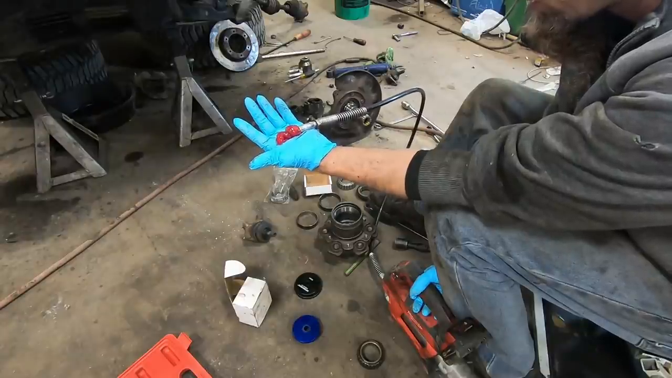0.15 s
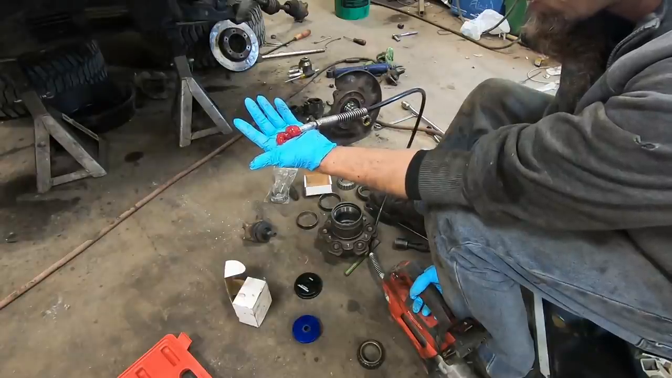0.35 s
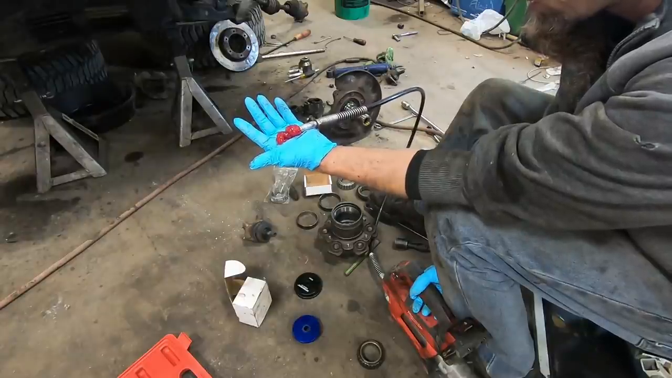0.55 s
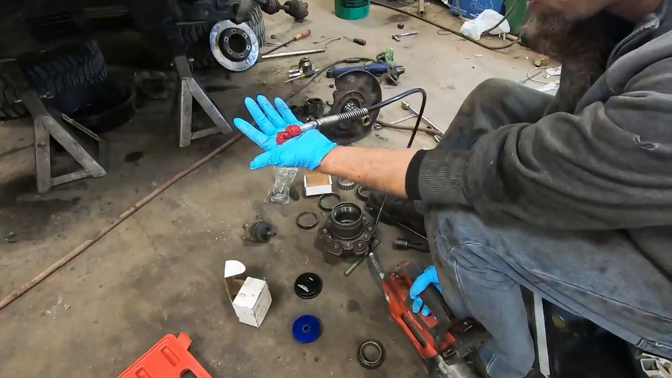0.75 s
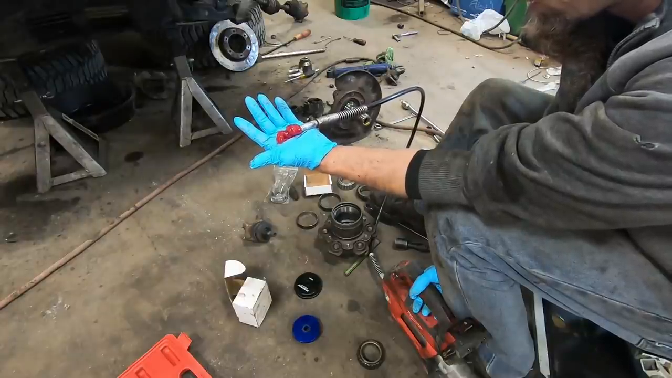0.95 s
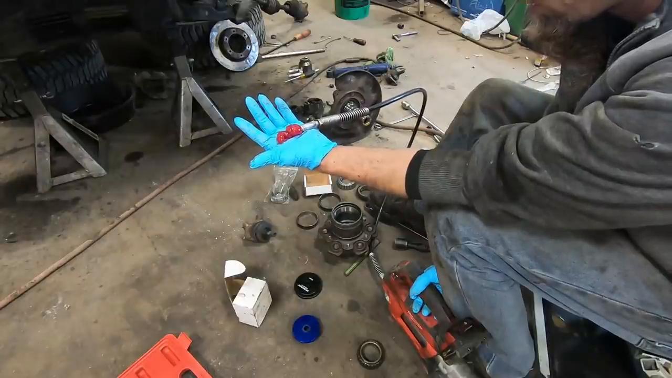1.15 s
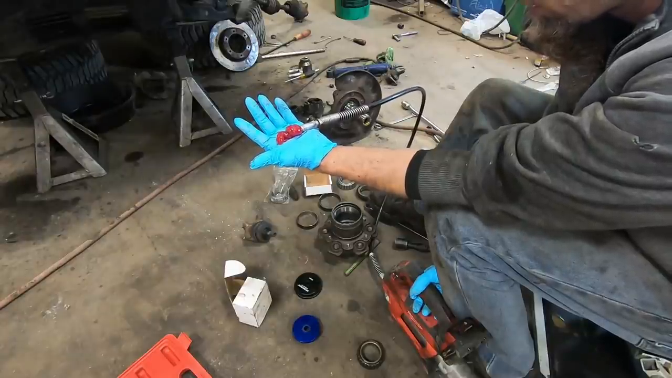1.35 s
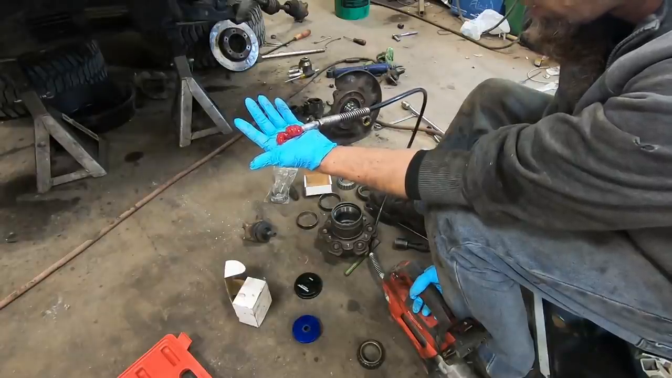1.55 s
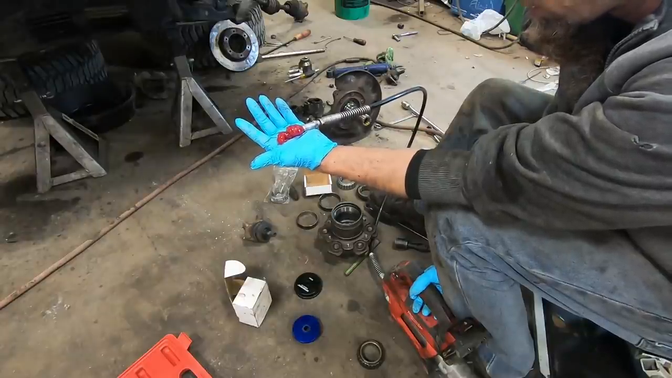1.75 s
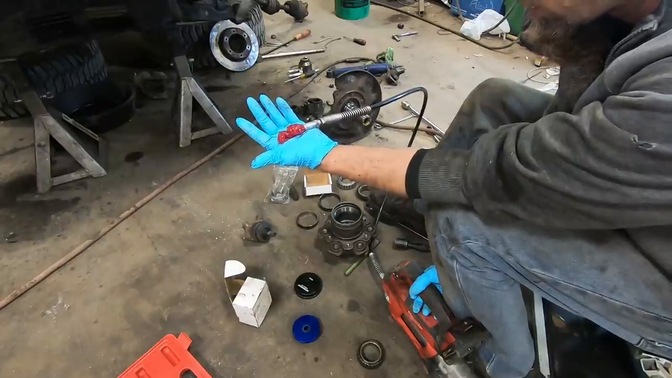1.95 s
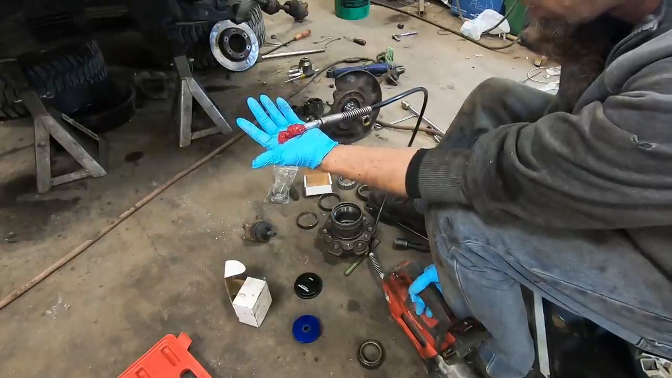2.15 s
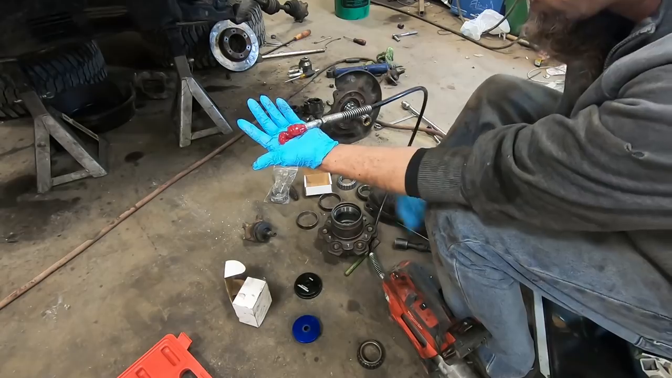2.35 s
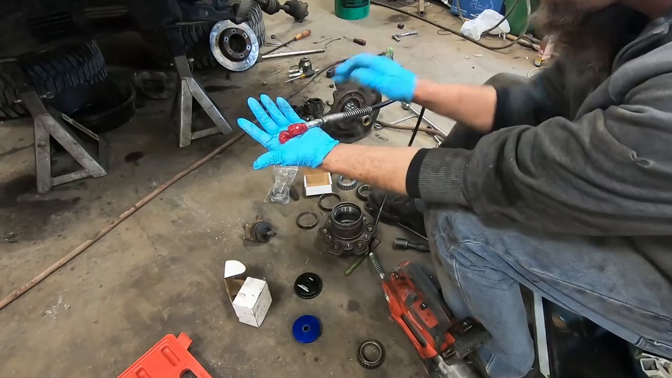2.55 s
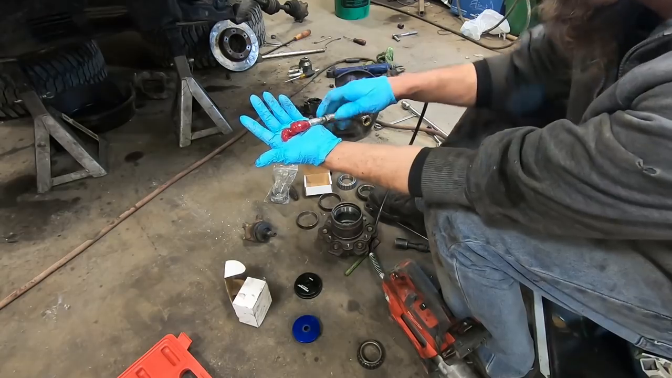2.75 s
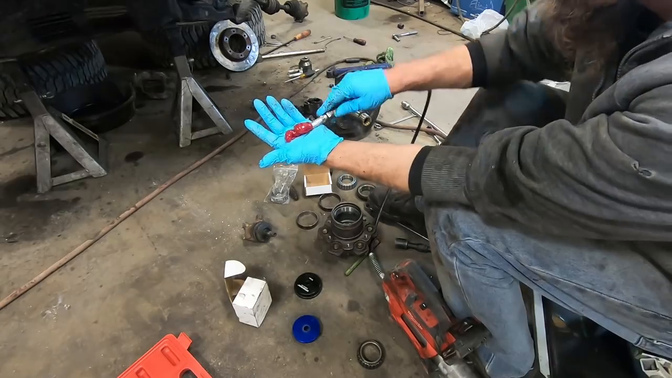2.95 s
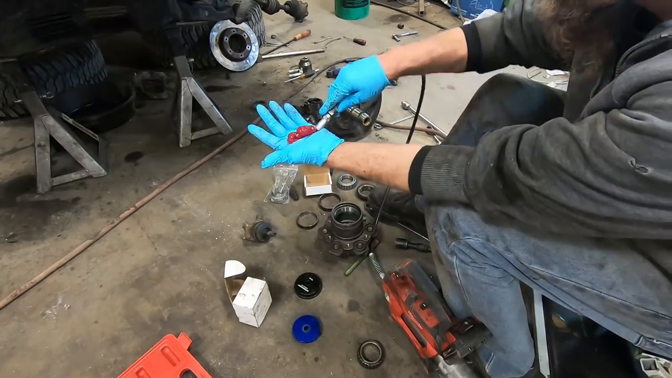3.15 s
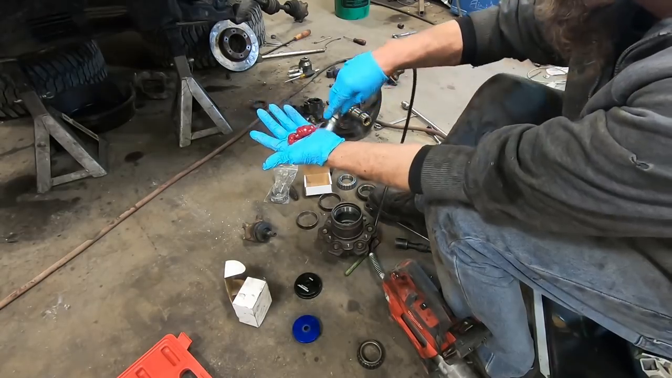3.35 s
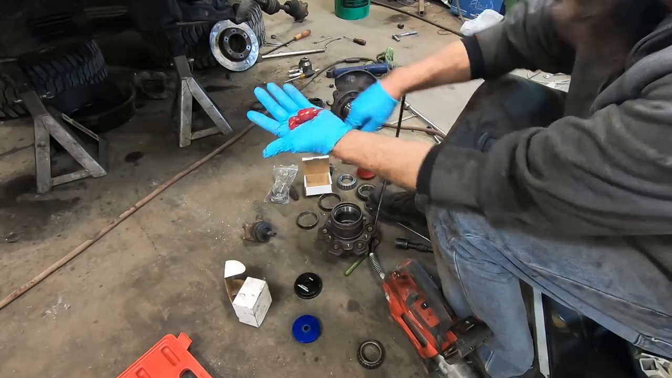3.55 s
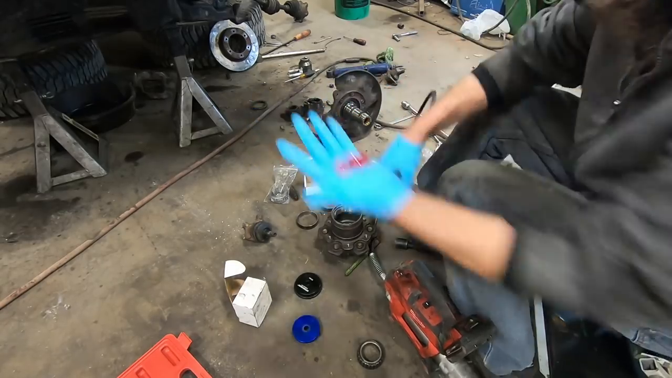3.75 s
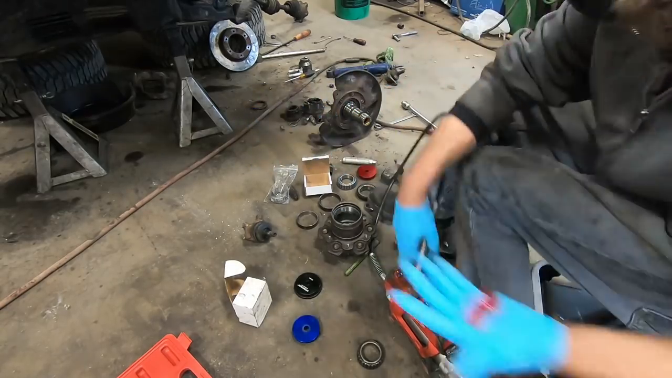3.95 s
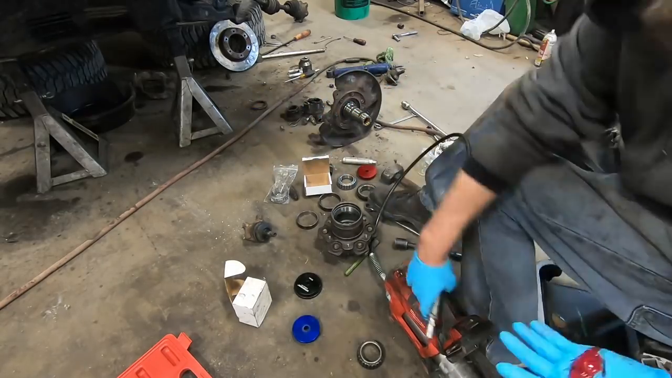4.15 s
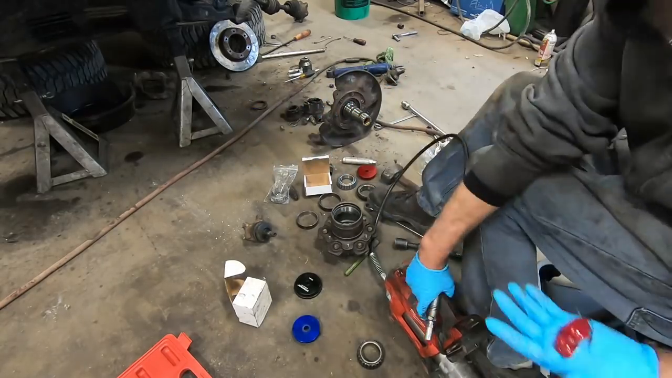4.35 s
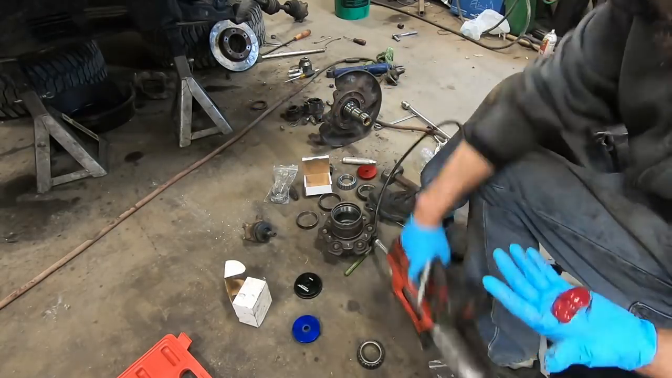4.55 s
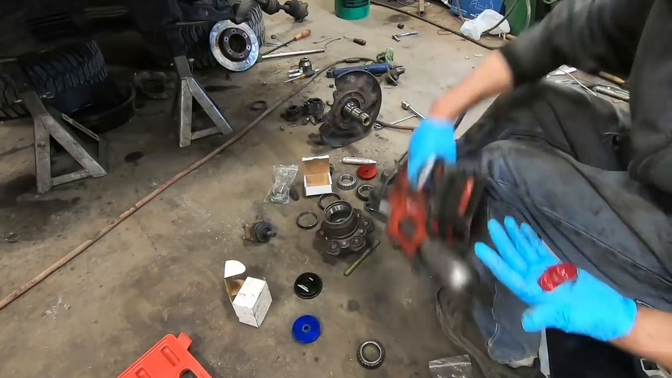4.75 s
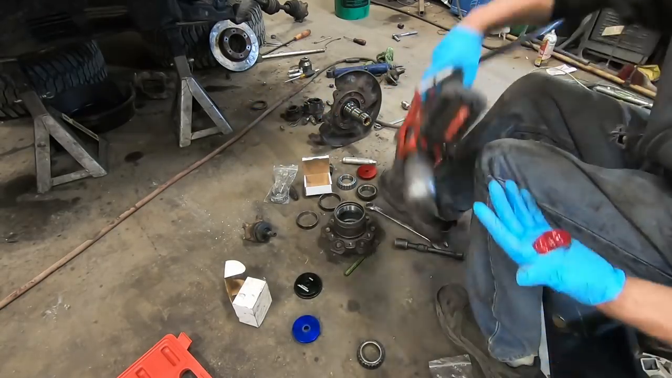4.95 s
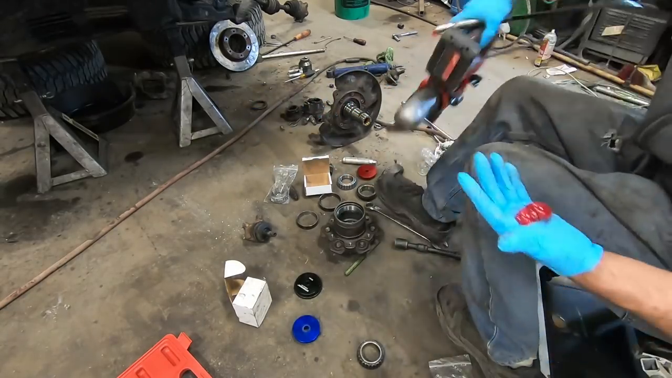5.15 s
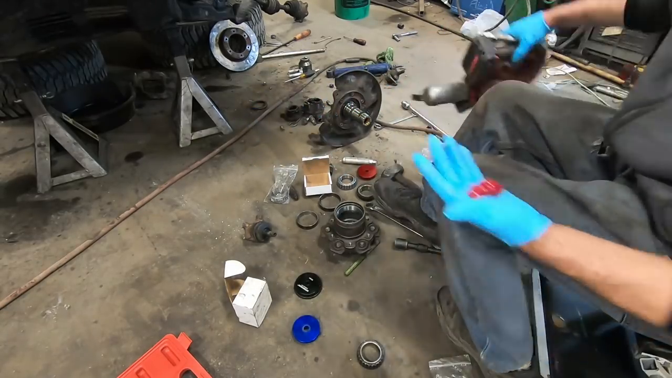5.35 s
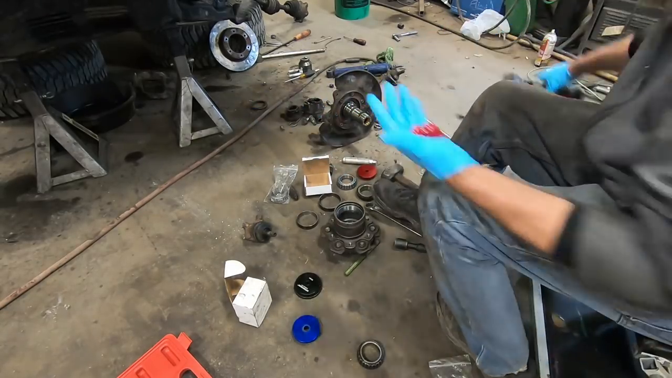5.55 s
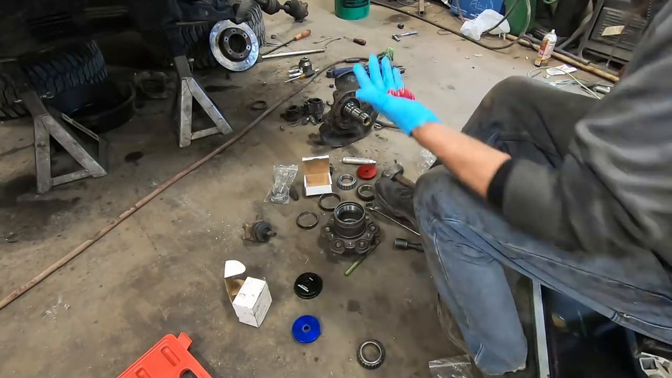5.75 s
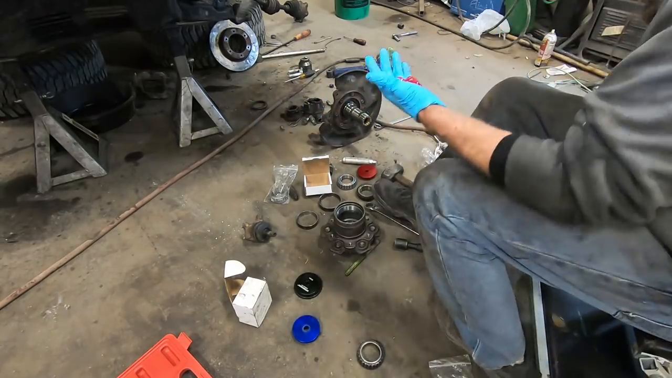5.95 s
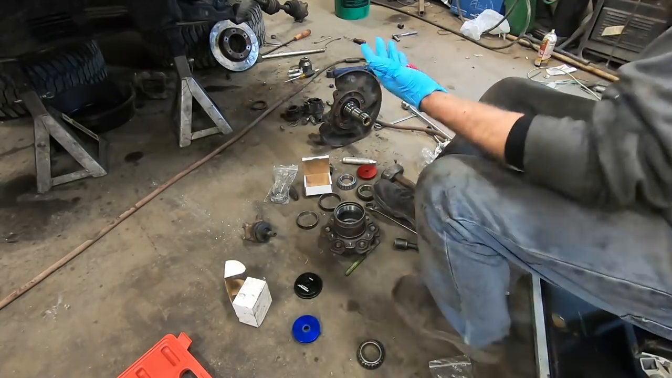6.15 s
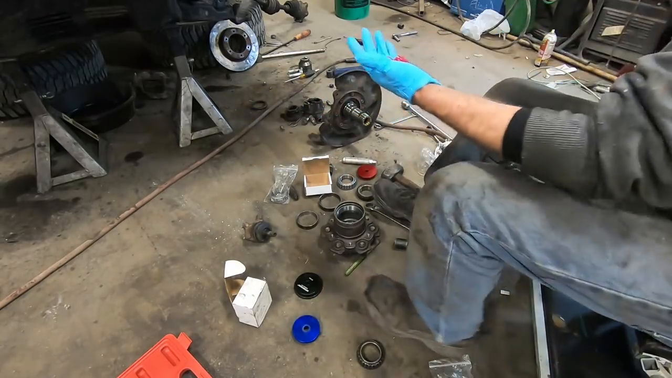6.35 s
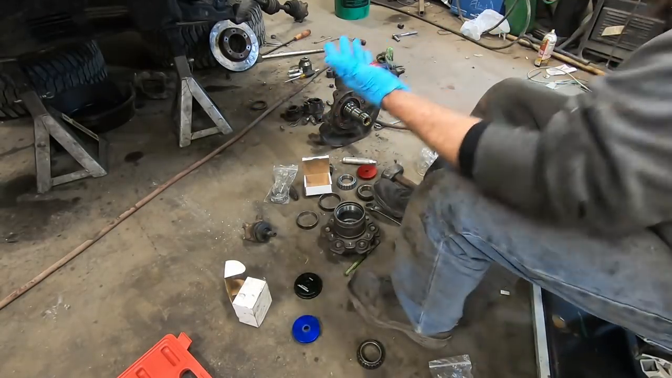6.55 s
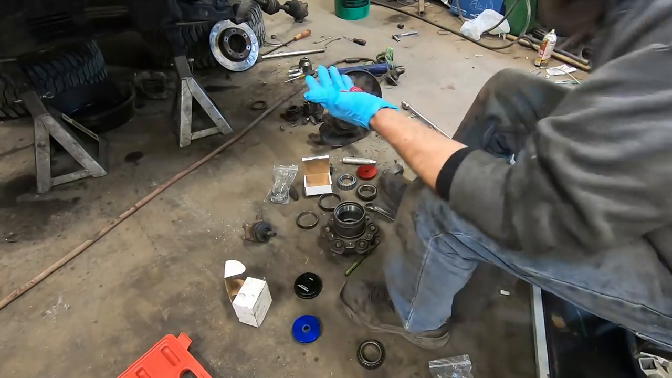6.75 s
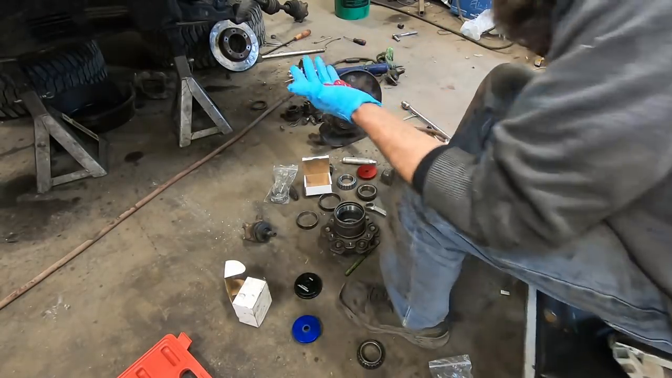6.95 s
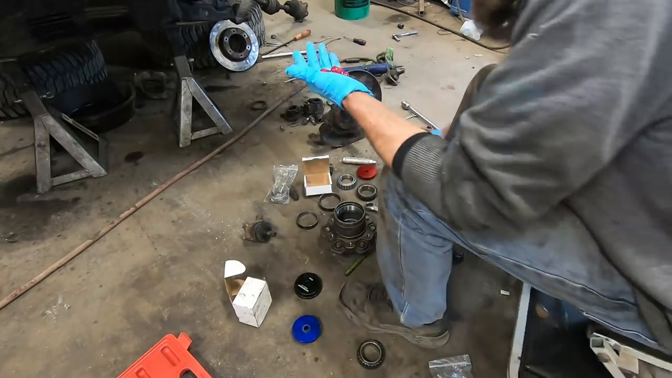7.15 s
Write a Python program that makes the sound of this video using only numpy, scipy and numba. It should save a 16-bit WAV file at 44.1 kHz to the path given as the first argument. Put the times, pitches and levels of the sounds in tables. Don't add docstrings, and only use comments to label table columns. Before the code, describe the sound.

A battery grease gun whines and strains through five snapping strokes, winds down, then is set on a hollow shelf with a thud and jingle.

```python
import sys
import numpy as np
from scipy import signal
from scipy.fft import rfft, irfft, next_fast_len
from scipy.io import wavfile
from scipy.ndimage import uniform_filter1d
from numba import njit

SR = 44100
rng = np.random.default_rng(int(sys.argv[2]) if len(sys.argv) > 2 else 0)


def waveform_to_disk(signal):
    frames = np.transpose(np.atleast_2d(signal))
    scaled = np.clip(frames, -1, 1) * 32767
    samples = np.round(scaled).astype(np.int16)
    wavfile.write(sys.argv[1], SR, samples)


def ratio(d):
    e = np.asarray(d, float) / 20
    return 10 ** e


N = 317079
TIME = np.arange(N) / SR
FAST = next_fast_len(N)

# time in seconds, peak in dB, delay of the next load in seconds.
CAM_DROPS = [
    (-.28, -9, 0),
    (0.1781, -2.5, -0.00029),
    (.627, -3, .005),
    (1.0771, -1.5, -0.0047),
    (1.5254, -3.5, 0),
    (1.9747, -3, 0),
    (2.425, -91, 0.015),
]
# seconds after the drop, load 0-1.
STROKE_LOAD = [(0, 0.4), (.03, 0.09), (.262, 0), (.28, .6), (.32, .8), (.38, .95), (.45, .6)]
# multiple of the shaft rate, level in dB running free, level in dB under load.
WHINE = [(1, -50, -45), (2, -47, -52), (4, -45, -48), (5, -45, -50), (8, -50, -48), (9, -48, -25.5),
         (10, -42, -28), (11, -50, -36), (12, -35, -41), (20, -50, -50), (24, -62, -46)]
# frequency in Hz, density in dB per Hz.
FREE_GEARS = [(71, -69), (120, -27.5), (329, -12.5), (514, -16.5), (681, -8.5), (904, -9), (1350, -3.5),
              (2030, -4.5), (3790, -4.5), (4030, -1.5), (4370, -4), (8500, -18), (12500, -25), (14100, -34),
              (15000, -72)]
# frequency in Hz, density in dB per Hz.
STRAINED_GEARS = [(71, -95), (120, -65), (173, -19.5), (224, -16.5), (298, -10.5), (387, -19), (801, -8.5),
                  (1000, -12), (1350, -9.5), (2200, -7), (2860, -4.5), (4370, -8), (7690, -15),
                  (12200, -23), (15000, -42)]
# frequency in Hz, width in Hz, level in dB.
HOUSING = [(1360, 440, 2.5), (1740, 42, -4), (2840, 220, -3.5), (3490, 350, -4.5), (6710, 800, 5.5),
           (7340, 290, 2)]
# frequency in Hz, level in dB, T60 in seconds.
SNAP_MODES = [(1000, -12, 0.0088), (2445, -5, 0.01), (4640, -11, 0.012), (5150, -5, 0.0082),
              (5640, -5.5, 0.0076), (6300, -3.5, 0.0081), (6870, -7, 0.012), (7540, -6, 0.012),
              (8140, -3.5, 0.01), (8970, -11, 0.0067)]
# frequency in Hz, density in dB per Hz.
FAN_AIR = [(3500, -22), (5500, -1), (7000, -12), (8500, -5), (12000, -17), (15000, -43)]
# frequency in Hz, left minus right in dB.
GUN_SIDE = [(60, -3), (110, 1), (200, -4), (370, 0.5), (690, -4), (1270, -8.5), (2330, -6), (4290, -6.5),
            (7890, -23), (14500, 2)]
# frequency in Hz, lead of the left in radians.
GUN_LEAD = [(0, -0.5), (780, -0.4), (1030, 0.41), (2070, 0.23), (3700, -0.8), (4910, 0.1), (5430, -2),
            (6030, -2.5), (8180, 0), (9390, 2), (10200, -0.22), (10400, -0.5), (11800, -1.2), (14700, -1)]
# frequency in Hz, T60 in seconds.
WALLS = [(90, .55), (190, .9), (400, 0.6), (1000, 0.91), (3000, 0.75), (7000, 0.49), (14000, 0.35)]
# frequency in Hz, density in dB per Hz.
SHOP_AIR = [(18, -18), (30, -2.5), (41, -10), (49, -10.5), (73, -51), (125, -41), (436, -46.5), (794, -56),
            (1080, -66), (1270, -34), (1920, -52), (2760, -36.5), (3230, -42.5), (6690, -36.5),
            (15000, -71)]
# multiple of the throb rate, level in dB, phase in radians.
THROB = [(1, -46.5, -0.59), (2, -59.5, 0.57)]
# time
# in seconds, level in dB.
RUBBING = [(2.6, -58), (2.79, -61.5), (2.9, -65.5), (3.28, -70), (3.7, -64), (3.77, -56.5), (3.85, -62),
           (4.25, -59), (4.4, -62), (4.55, -65), (4.66, -59), (4.8, -63.5), (4.95, -62.5), (5.5, -67),
           (5.96, -67), (6.5, -61.5), (6.75, -65), (7.05, -55)]
# start in seconds, length in seconds, level in dB, floor rumble in dB.
SHIFTS = [
    (3.83, .17, -73.5, -7),
    (4.32, 0.13, -63, -15),
    (4.66, .33, -66, -14),
    (6.59, .12, -63, -14),
    (7.036, .3, -58, 8),
]
# frequency in Hz, gain in dB.
CLOTH = [(60, -6), (200, 5), (500, -6.5), (750, 4.5), (1000, -4), (1600, 1.5), (2300, 0), (3200, 1.5),
         (5000, -2.5), (7000, 2), (9500, -8.5)]
# time in seconds, crack in dB, body in dB.
TICKS = [(3.499, -50, -71), (3.7469, -46.5, -49), (3.7694, -47, -48), (3.838, -46, -40), (4.2927, -41, -57),
         (4.309, -38, -56), (4.3299, -44, -28), (4.359, -42, -47), (4.3987, -49, -44), (4.5197, -50, -54),
         (4.5532, -46, -64), (6.5926, -38, -44), (6.6023, -27.5, -36), (6.6193, -50, -40),
         (6.8146, -47, -62), (6.8269, -43, -56), (6.8323, -42, -53), (6.8474, -46, -61), (6.917, -52, -32),
         (6.9458, -26, -33.5), (6.9667, -36, -32)]
# time in seconds, crack in dB, body in dB, thump in dB.
BOOT = [(6.0433, -35, -33, -31), (6.0544, -33, -31, -30), (6.078, -28, -28, -14), (6.1, -32, -31, -26),
        (6.135, -35, -33, -28), (6.17, -39, -37, -32), (6.203, -43, -41, -31), (6.95, -38, -39, -40)]
# frequency in Hz, gain in dB.
CRACK_TREBLE = [(2200, -12.5), (3000, 2.5), (4500, 1), (6800, 6), (8500, -4), (10000, -17.5), (12000, -18),
                (15000, -42)]
# time in seconds, level in dB.
HOOKS = [(4.397, -49.5), (4.45, -54)]
# frequency in Hz, level in dB, T60 in seconds.
HOLDER_MODES = [(6870, 1.5, .1), (9200, -14, .05), (11600, -17, .05)]
# time in seconds, level in dB.
JINGLES = [(4.63, -64), (4.698, -61), (4.8435, -60), (4.862, -59), (5.004, -45.5), (5.012, -41.5),
           (5.025, -43), (5.045, -44), (5.07, -45.5), (5.0929, -44.5), (5.11, -55), (5.13, -56),
           (5.18, -73), (5.21, -71)]
# frequency in Hz, level in dB, T60 in seconds.
RING_MODES = [(3612, -7, .12), (4953, -14, .13), (6444, 3, .11), (7720, -4, .09), (8150, -1, .08),
              (8330, 1, .11), (8600, -1, .09), (10500, -19, .08), (11530, -13, .08), (12470, -18, .08)]
# time in seconds, level in dB.
PINGS = [(4.63, -62), (4.698, -51), (5.004, -49), (5.0929, -50), (5.21, -66)]
# time in seconds, level in dB.
THUDS = [(4.625, -50), (4.7, -53.5), (4.751, -51), (4.86, -52), (4.99, -36), (5.0014, -10.5),
         (5.008, -11.5), (5.022, -16.5), (5.035, -12), (5.065, -22.5), (5.0933, -19.5), (5.108, -20.5)]
# frequency in Hz, level in dB, T60 in seconds.
SHELF_MODES = [(190, 1, .18), (225, 0, .14), (258, 3, .28), (317, 0, .12), (415, -5, .12), (520, -6, .1),
               (735, -4, .22), (960, -8, .12), (1230, -10, .12), (1480, -15, .08), (1690, -17, .1)]
# frequency in Hz, density in dB per Hz.
CRUNCH = [(76, -55), (130, -15.5), (204, -5.5), (317, -15.5), (363, -18), (543, -10), (623, -17),
          (724, -6.5), (852, -15.5), (1240, -21), (2600, -49), (3380, -80), (5720, -120)]


def level(x, db):
    return x * ratio(db) / np.sqrt(np.mean(x ** 2))


def on_log(hz, table):
    table_hz, value = np.transpose(table)
    return np.interp(np.log(hz + 1), np.log(table_hz + 1), value)


def colour(x, table):
    gain = ratio(on_log(np.fft.rfftfreq(FAST, 1 / SR), table))
    return irfft(rfft(x, FAST) * gain, FAST)[..., :N]


def band(x, lo_hz, hi_hz):
    return signal.sosfilt(signal.butter(2, [lo_hz, hi_hz], "band", fs=SR, output="sos"), x)


def steep_band(x, lo_hz, hi_hz):
    return band(band(x, lo_hz, hi_hz), lo_hz, hi_hz)


def walk(rate):
    hold = int(SR / rate)
    steps = np.repeat(rng.standard_normal(N // hold + 1), hold)
    return 1.3 * uniform_filter1d(uniform_filter1d(steps, hold), hold)[:N]


def pan(db):
    return ratio(np.array([[db], [-db]]) / 2)


def strike(hits, modes, scatter_db, push_s):
    hits = np.array(hits)
    at = (hits[:, 0] * SR).astype(int)
    heard = at >= 0
    shape = len(hits), len(modes)
    share = ratio(scatter_db * rng.standard_normal(shape)) * rng.choice([-1, 1], shape)
    push = np.exp(-1 / (push_s * SR))
    out = 0
    for k, (hz, db, t60) in enumerate(modes):
        blows = np.zeros(N)
        blows[at[heard]] = (ratio(hits[:, 1] + db) * share[:, k])[heard]
        turning = np.exp(2j * np.pi * hz * TIME)
        blows = signal.lfilter([1 - push], [1, -push], blows * turning) / turning
        pole = np.exp(2j * np.pi * hz / SR - np.log(1000) / (t60 * SR))
        out = out + signal.lfilter([1], [1, -pole], np.conj(blows)).imag
    return out


def fading(hits, t60):
    at, db = np.transpose(hits)
    blows = np.zeros(N)
    blows[(at * SR).astype(int)] = ratio(db)
    return signal.lfilter([1], [1, -np.exp(-np.log(1000) / (t60 * SR))], blows)


def gun():
    stop_s, stop_t60_s, ease_s = 2.326, 0.17, .045
    free_hz, sag_hz, rotor_s = 347, 45, .05
    push_from_s, push_to_s = .27, .44

    drops, _, late = np.transpose(CAM_DROPS)
    stroke = np.searchsorted(drops, TIME) - 1
    since = TIME - drops[stroke]
    since = since - late[stroke] * np.clip(since / .25, 0, 1)
    load = uniform_filter1d(np.interp(since, *np.transpose(STROKE_LOAD)), size=700)
    push_part = np.clip((since - push_from_s) / (push_to_s - push_from_s), 0, 1)
    pushing = np.sin(np.pi * push_part).clip(0) ** .6

    inertia = 1 / (rotor_s * SR)
    shaft_hz = free_hz - sag_hz * signal.lfilter([inertia], [1, inertia - 1], pushing)
    coasting = np.clip(TIME - stop_s, 0, 1)
    turns = np.cumsum(shaft_hz * (1 + .002 * walk(15)) * np.exp(-coasting / 0.16)) / SR

    whine = 0
    for k, free_db, loaded_db in WHINE:
        db = (1 - load) * free_db + load * loaded_db + (1 + 1.2 * load) * walk(25)
        wander = (.4 + .5 * load) * walk(39.77)
        whine = whine + ratio(db) * np.sin(2 * np.pi * k * turns + wander + k * k)

    flaws = rng.standard_normal(768)[(turns / 6 % 1 * 768).astype(int)]
    teeth = np.sqrt(.2) * flaws + np.sqrt(.8) * rng.standard_normal(N)
    grit_db = 2.5 * np.minimum(rng.exponential(size=N), 5)
    teeth = teeth * ratio(grit_db + 1.5 * walk(60) + np.cos(2 * np.pi * turns))
    teeth = teeth + sum(ratio(db) * signal.lfilter(*signal.iirpeak(hz, hz / width, fs=SR), teeth)
                        for hz, width, db in HOUSING)
    clatter = (1 - load) * level(colour(teeth, FREE_GEARS), -29.5)
    clatter = clatter + load * level(colour(teeth, STRAINED_GEARS), -23.0)

    running = ratio(-60 * coasting / stop_t60_s)
    eased = ratio(-60 * np.clip(TIME - stop_s + ease_s, 0, 1) / stop_t60_s)
    air = level(colour(rng.standard_normal((2, N)), FAN_AIR), -41.5) * running
    snap = strike(CAM_DROPS, SNAP_MODES, scatter_db=0.0, push_s=0.00058)
    return (ratio(1.5) * whine * eased + clatter) * running + snap, air


def beside(x):
    hz = np.fft.rfftfreq(FAST, 1 / SR)
    half = ratio(on_log(hz, GUN_SIDE) / 2) * np.exp(.5j * on_log(hz, GUN_LEAD))
    return irfft(rfft(x, FAST) * np.array([half, 1 / half]), FAST)[:, :N]


def room(x, wet_db):
    t, echo = TIME[:int(1.5 * SR)], 0
    for hz in 90 * 2. ** np.arange(8):
        middle, side = rng.standard_normal((2, len(t)))
        noise = middle + min(hz / 1200, 1) * side * np.array([[1], [-1]])
        echo = echo + band(noise, hz / 1.48, hz * 1.526) * ratio(-60 * t / on_log(hz, WALLS))
    echo = echo * np.clip((t - .004) / 0.0054, 0, 1)
    echo = echo / np.sqrt(np.sum(echo[0] ** 2))
    return ratio(wet_db) * signal.fftconvolve(np.atleast_2d(x), echo, axes=1)[:, :N]


def shop():
    throb_hz = 23.768
    air = rng.standard_normal((3, N))
    air = colour(air[0] + 1.9 * air[1:], SHOP_AIR)
    air = level(band(air, 62, 20900), -62.5) * ratio(0.27 * walk(1.2))
    throb = 0
    for k, db, rad in THROB:
        swell = np.sqrt(2) * ratio(db + 1.4 * walk(3.14))
        throb = throb + swell * np.cos(2 * np.pi * k * throb_hz * TIME + rad)
    return air + throb * pan(-.6)


def rustle():
    s, db = np.transpose(RUBBING)
    arms = ratio(np.interp(TIME, s, db) - 20 * (TIME < s[0]))
    seat, floor = 0, 0
    for start, length, db, deep_db in SHIFTS:
        leaning = np.clip(np.minimum(TIME - start, start + length - TIME) / .04, 0, 1)
        seat = seat + ratio(db) * leaning
        floor = floor + ratio(db + deep_db) * leaning

    layers = [(arms, 632, 3950),
              (arms * ratio(-1), 2840, 9960),
              (arms * ratio(-15) + seat, 124, 494),
              (ratio(-77) + floor, 56, 122)]
    out = 0
    for gain, lo, hi in layers:
        grains = rng.standard_normal((3, N)) * ratio(2 * np.minimum(rng.exponential(size=N), 5))
        grains = grains[0] + min(lo / 700, 1) * grains[1:]
        out = out + level(steep_band(grains, lo, hi), 0) * gain * ratio(2 * walk(14))
    return colour(out, CLOTH)


def knocks():
    tick_thump_db, tick_pan_db = -16, -9
    boot_pan_db, boot_scuff_s = -5, 0.054
    ring_on_s, ring_on_s_per_db = .036, .0004

    blows = [(s, crack, body, body + tick_thump_db, tick_pan_db, 0) for s, crack, body in TICKS]
    blows += [(*row, boot_pan_db, boot_scuff_s) for row in BOOT]
    bands = np.zeros((3, 2, N))
    for s, crack_db, body_db, thump_db, pan_db, scuff_s in blows:
        i = int(s * SR)
        t = TIME[:min(6000, N - i)]
        t60 = ring_on_s + ring_on_s_per_db * (max(crack_db, body_db) + 39.5)
        for k, db in enumerate((crack_db - 9, body_db - 4.5, thump_db)):
            fade_s = max(t60 * (1 + 0.29 * k) + scuff_s * (k < 2), .004)
            burst = rng.standard_normal(len(t)) * ratio(db - 60 * t / fade_s)
            burst = burst * np.minimum(t / 0.0006, 1)
            bands[k, :, i:i + len(t)] += burst * pan(pan_db / (1 + k))
    crack = colour(bands[0], CRACK_TREBLE) * ratio(4.5)
    body = steep_band(bands[1], 570, 2600) * ratio(8.0)
    thump = steep_band(bands[2], 110, 480) * ratio(11.5)
    return crack + body + thump


def jingle():
    holder = strike(HOOKS, HOLDER_MODES, scatter_db=0.5, push_s=.0005)
    ring = strike(JINGLES, RING_MODES, scatter_db=3.5, push_s=.0005)
    pings = strike(PINGS, RING_MODES[:1], scatter_db=0, push_s=.0005) * ratio(8)
    scratch = band(fading(JINGLES, 0.09) * rng.standard_normal(N), 5500, 9000) * ratio(5.5)
    return holder + ring + pings + scratch


def thud():
    crunch = fading(THUDS, 0.11) * level(colour(rng.standard_normal(N), CRUNCH), -10.5)
    shelf = strike(THUDS, SHELF_MODES, scatter_db=2.5, push_s=0.0013) * ratio(-6.5)
    return band(band(shelf + crunch, 141, 2500), 140, 2500)


def scene():
    tool, air = gun()
    mix = beside(tool) + air + room(tool, -9.5)
    mix = mix + shop() + rustle()
    taps = knocks()
    mix = mix + taps + room(taps, -2)
    ring = jingle() * pan(-8.0)
    mix = mix + ring + room(ring, -16.5)
    shelf = thud() * pan(-2.4)
    return mix + shelf + room(shelf, -9)


@njit
def follow(x, attack, release):
    e, out = np.mean(x[:4000]), np.empty(len(x))
    for i in range(len(x)):
        e += (x[i] - e) * (attack if x[i] > e else release)
        out[i] = e
    return out


def top_cut(x):
    return signal.sosfilt(signal.butter(12, 15120, fs=SR, output="sos"), x)


def record(dry):
    loud = follow(np.abs(dry).max(axis=0), 1 / (0.0019 * SR), 1 / (.06 * SR))
    gain = np.minimum(1, ratio(-19.5) / loud) ** 0.66
    top = .85
    return top_cut(top * np.tanh(dry * gain / top))


dry = scene()
out = record(dry)
waveform_to_disk(out)
```